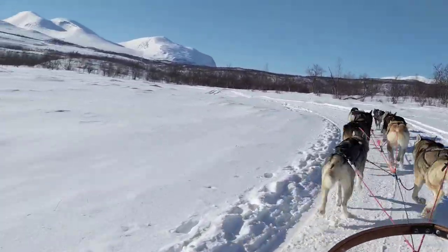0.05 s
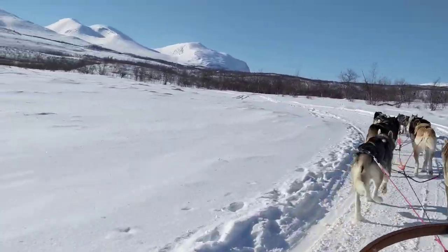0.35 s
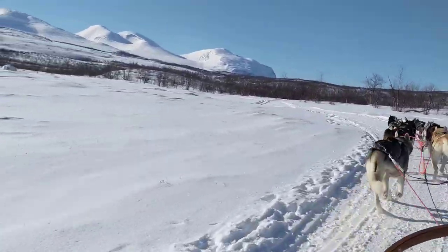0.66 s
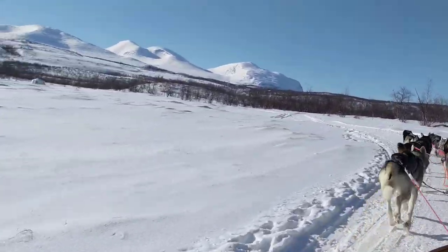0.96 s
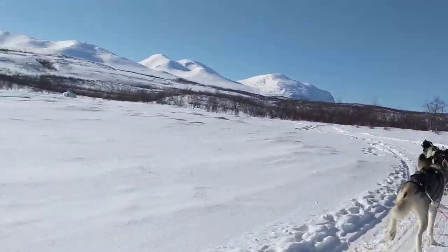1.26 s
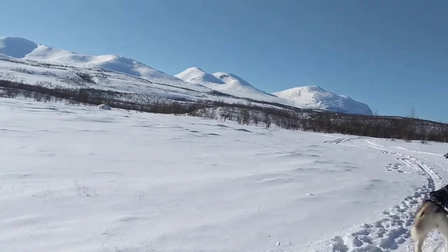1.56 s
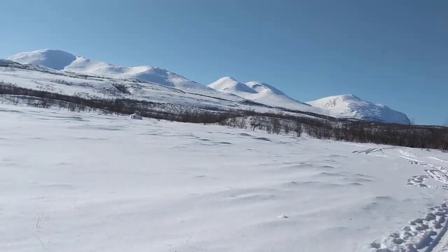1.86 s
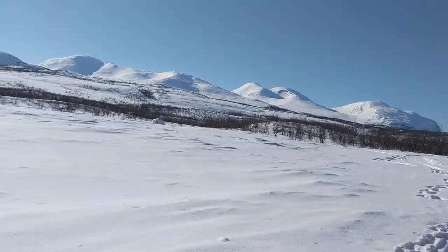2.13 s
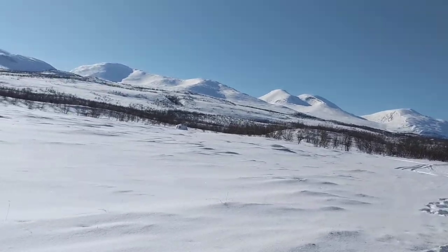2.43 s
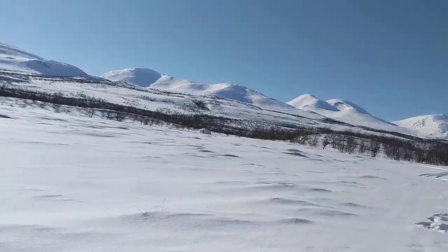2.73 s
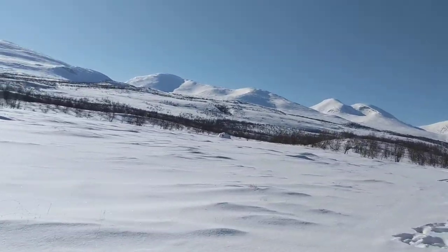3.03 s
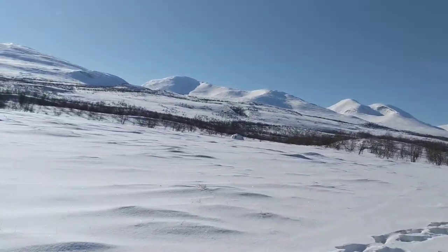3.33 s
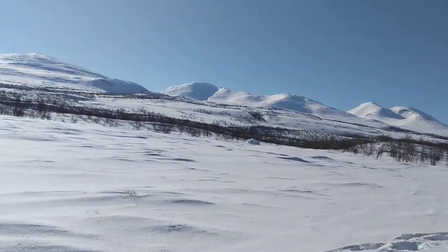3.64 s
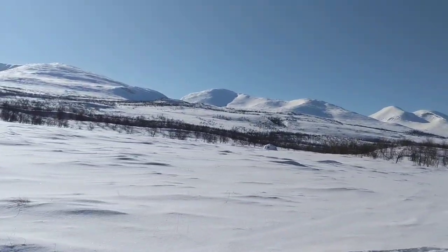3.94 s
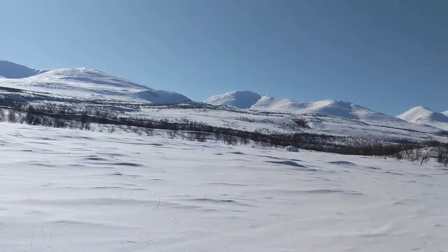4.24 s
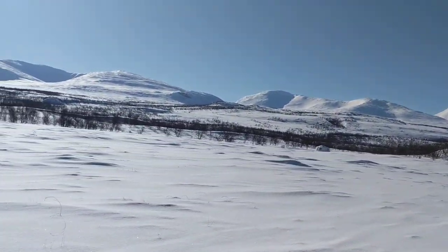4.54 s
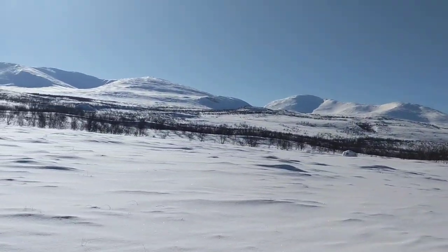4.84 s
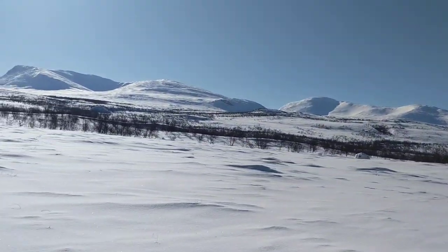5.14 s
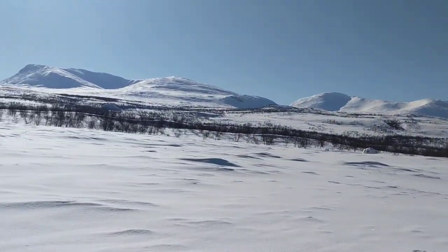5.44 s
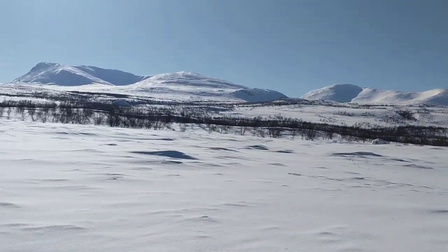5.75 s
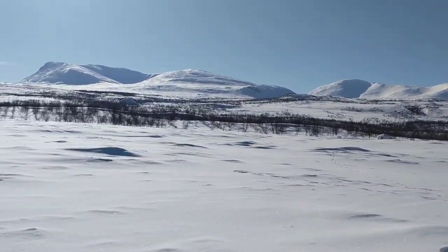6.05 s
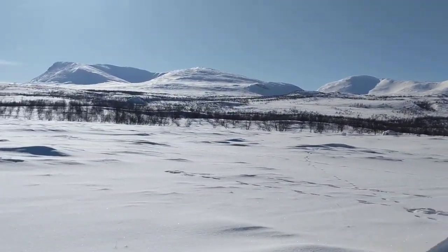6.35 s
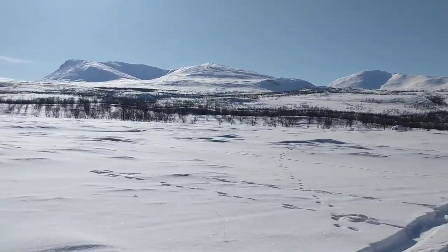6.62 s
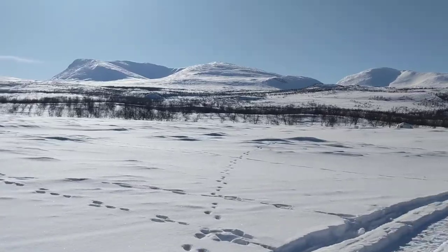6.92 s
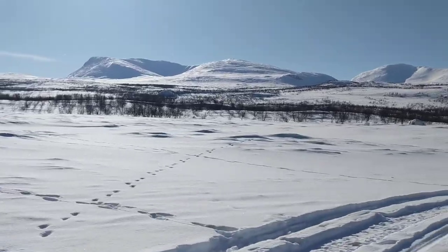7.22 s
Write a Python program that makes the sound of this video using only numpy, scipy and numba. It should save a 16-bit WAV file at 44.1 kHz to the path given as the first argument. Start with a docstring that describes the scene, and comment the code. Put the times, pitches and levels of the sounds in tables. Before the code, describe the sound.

A headwind buffets a microphone riding on a dog sled across open snow. The rough, fluttering rumble swells and dips unevenly, with dry pops and a few low thumps. Underneath, the runners hiss and scrape faintly, snow crust ticks, and metal harness snaps give tiny high clinks. One sharp click sounds close by early on. There is no echo.

```python
"""Headwind buffets a microphone riding on a dog sled over packed snow in open country.
Eddies (small whirls of air) at the microphone's opening make a rumble that gets brighter and louder
with the airspeed, with slow thumps, dry pops and overload on the hardest hits. Underneath, the runners
hiss and scrape, snow crust ticks, and metal snaps on the harness lines clink.
Faint, very high pings sparkle in the background, and one sharp click sounds close by."""
import sys
import numpy as np
from scipy import signal
from scipy.fft import rfft, irfft, next_fast_len
from scipy.io import wavfile
from scipy.ndimage import uniform_filter1d, minimum_filter1d
from numba import njit

SR = 44100
rng = np.random.default_rng(int(sys.argv[2]) if len(sys.argv) > 2 else 0)


def wav_record(signal):
    """Record a signal, one row per channel, as 16-bit PCM in the file named by sys.argv[1]."""
    frames = np.transpose(np.atleast_2d(signal))
    bounded = np.clip(frames, -1, 1)
    # unit amplitude maps onto the largest positive 16-bit level
    quanta = np.round(bounded * 32767).astype(np.int16)
    wavfile.write(sys.argv[1], SR, quanta)


N = 325458
TIME = np.arange(N) / SR

# The gusts, as how fast eddies pass the opening (faster air, more eddies): time_s, eddy_rate_hz
GUSTS = [(0.0, 810), (0.28, 660), (0.37, 754), (0.85, 960), (1.13, 627), (1.64, 610), (1.79, 817),
         (2.14, 622), (2.47, 308), (2.6, 840), (2.72, 700), (2.8, 407), (3.035, 583), (3.06, 895),
         (3.52, 750), (3.93, 654), (4.11, 833), (4.165, 367), (4.42, 257), (4.59, 343), (4.79, 498),
         (5.28, 458), (5.54, 797), (5.68, 533), (5.98, 675), (6.17, 963), (6.27, 560), (6.4, 388),
         (6.53, 685), (6.66, 370), (6.97, 696), (7.12, 430), (7.38, 416)]
# How the sound of the glide rises and falls, in relative levels: time_s, hiss_db, spray_db
GLIDE = [(0.0, -53.5, -63), (0.35, -51.5, -62), (0.55, -55.5, -66), (1.2, -57, -65), (1.58, -54, -62.5),
         (2.26, -60, -67.5), (2.46, -51.5, -59), (2.62, -61.5, -67.5), (2.86, -54, -59.5),
         (3.07, -56.5, -66), (3.19, -59.5, -65), (4.11, -58, -67.5), (4.5, -51, -59.5), (4.7, -55, -63.5),
         (5.3, -54.5, -64.5), (5.45, -57, -64.5), (5.9, -58.5, -67.5), (6.4, -58, -66), (7.38, -59, -67.5)]
# The tone of runners sliding on snow: pitch_hz, level_db
RUNNER_TONE = [(150, 24), (750, 8), (1200, 11), (2100, 9.5), (3200, 1), (5000, -0.5), (6500, 0),
               (7700, 4.5), (8400, -10), (10000, -39)]
# The tone of thrown powder snow: pitch_hz, level_db
POWDER_TONE = [(2000, 6), (6000, -3), (9000, 0), (11500, 0), (14000, -2.5), (16000, -7)]


def from_db(db):
    """Turn decibels into a number to multiply a sound by."""
    return 10 ** (np.asarray(db) / 20)


def rms_one(x):
    """Scale a signal so that its average size (rms) is 1."""
    return x / np.sqrt(np.mean(x ** 2) + 1e-20)


def in_time(rows):
    """Join the rows of a time table with straight lines, giving one curve per value column."""
    times_s, *columns = np.transpose(rows)
    return [np.interp(TIME, times_s, column) for column in columns]


def drift(rate_hz):
    """A smooth random wobble of size 1 that changes about rate_hz times a second."""
    r = np.exp(-2 * np.pi * rate_hz / SR)
    return rms_one(signal.lfilter([1], [1, -2 * r, r * r], rng.standard_normal(N + SR))[SR:])


def noise(tone):
    """Noise shaped by a table of pitch_hz, level_db."""
    hz, db = np.transpose(tone)
    size = next_fast_len(N)
    bins_hz = np.maximum(np.fft.rfftfreq(size, 1 / SR), 1)
    gain = from_db(np.interp(np.log(bins_hz), np.log(hz), db))
    return irfft(rfft(rng.standard_normal(size)) * gain, size)[:N]


def keep_side(x, hz, side, order):
    """Keep the "low" or "high" side of hz; a higher order cuts more steeply."""
    return signal.sosfilt(signal.butter(order, hz, side, fs=SR, output="sos"), x + 1e-18)


@njit
def moving_lowpass(x, corner_hz, damping):
    """Soften the treble above a corner pitch that moves from sample to sample."""
    out, band_state, low_state = np.empty(len(x)), 0., 0.
    for i in range(len(x)):
        g = np.tan(np.pi * corner_hz[i] / SR)
        band = (band_state + g * (x[i] - low_state)) / (1 + g * (g + damping))
        out[i] = low_state + g * band
        band_state, low_state = 2 * band - band_state, 2 * out[i] - low_state
    return out


def strikes(rows):
    """One click for each row of start_s, level_db."""
    start_s, level_db = np.transpose(rows)
    return np.bincount(np.clip(start_s * SR, 0, N - 1).astype(int), from_db(level_db), N)


def scatter(per_s):
    """Clicks at random times, with random heights up to 1."""
    return rng.random(N) * (rng.random(N) < per_s / SR)


def tails(clicks, decay_s):
    """Give each click a tail that dies away."""
    return signal.lfilter([1], [1, -np.exp(-1 / (decay_s * SR))], clicks + 1e-18)


def ring(clicks, hz, ring_s):
    """Each click starts a pure tone that fades by 60 dB in ring_s."""
    r, w = np.exp(-np.log(1000) / (ring_s * SR)), 2 * np.pi * hz / SR
    return signal.lfilter([0, np.sin(w)], [1, -2 * r * np.cos(w), r * r], clicks + 1e-18)


def swell(middle_s, half_length_s, edge=2):
    """A smooth rise to 1 and back; a larger edge gives a flatter top and steeper sides."""
    return np.exp(-.5 * np.minimum(np.abs(TIME - middle_s) / half_length_s, 10) ** edge)


def high_sparkle(count=16, pings_per_s=4.0, level_db=-60, pulse_hz=2.7, pulse_db=6.0):
    """Faint, very high pings at random times and pitches, pulsing and louder as the high hiss rises."""
    _, spray_db = in_time(GLIDE)
    pulse = np.sin(2 * np.pi * (pulse_hz * TIME + rng.random()))
    loudness = from_db(level_db + spray_db - spray_db.mean() + pulse_db * pulse)
    pitches_hz = rng.normal(12900, 650, count)
    return sum(ring(loudness * scatter(pings_per_s), hz, ring_s=.035) for hz in pitches_hz)


def harness_snaps(gain_db=-25.5, slide_s=.008):
    """Metal snaps slide briefly on their rings, and the rubbing makes them clink."""
    # When a snap touches, and how hard: start_s, level_db
    touches = [(0.0044, -42), (1.4067, -45), (2.8285, -44), (4.5341, -44), (4.5944, -49), (4.6359, -50),
               (4.6744, -52), (4.7421, -48), (4.9856, -55), (5.4784, -50), (7.0439, -44)]
    # The tones a snap rings with: pitch_hz, level_db, ring_s
    snap_tones = [(10900, -6, .015), (12100, -9.5, .02), (12650, 5, 0.03), (13150, -12, .04),
                  (13600, 3, .022), (14100, -6.5, .015)]
    slides = tails(strikes(touches), slide_s)
    contact = from_db(gain_db) * keep_side(slides, 120, "low", order=1)   # builds up over 1-2 ms
    return sum(ring(from_db(db) * contact * rng.standard_normal(N), hz, ring_s)
               for hz, db, ring_s in snap_tones)


def snow_crust(powder_db=-8.5, runner_db=-1.0, crumbs_per_s=7, crumb_db=-43):
    """Breaking crust ticks through the powder and through the runner; crumbs break in between."""
    # The crust snapping under the runners: start_s, level_db
    cracks = [(0.4115, -31), (0.6494, -40), (0.7327, -31), (0.8524, -45), (3.3553, -35), (4.4842, -32),
              (4.789, -38), (4.829, -32), (6.2437, -41), (6.336, -39), (6.7131, -38)]
    breaks = strikes(cracks) + from_db(crumb_db) * scatter(crumbs_per_s)
    crunch = from_db(powder_db) * noise(POWDER_TONE) + from_db(runner_db) * noise(RUNNER_TONE)
    return tails(breaks, decay_s=0.0025) * crunch


def runner_scrapes(runner_hz=4300):
    """Harder snow rubs a runner and makes it sound in a broad band around one pitch."""
    # Patches of harder snow: middle_s, half_length_s, level_db
    patches = [(0.39, .04, -54), (4.48, .02, -54), (6.39, 0.024, -52)]
    rubbing = rms_one(ring(rng.standard_normal(N), runner_hz, ring_s=0.0023))
    return rubbing * sum(from_db(db) * swell(middle_s, half_s) for middle_s, half_s, db in patches)


def runner_hiss(gain_db=6.5, hiss_grain_db=1.7, spray_grain_db=2.5, hiss_lump_db=0.9, spray_lump_db=1.0):
    """Countless crystals break under the runners; grains and lumps roughen the hiss and powder spray."""
    hiss_db, spray_db = in_time(GLIDE)
    grains, lumps = drift(130), drift(18)
    hiss = from_db(hiss_db + hiss_lump_db * lumps + hiss_grain_db * grains) * noise(RUNNER_TONE)
    spray = from_db(spray_db + spray_lump_db * lumps + spray_grain_db * grains) * noise(POWDER_TONE)
    return from_db(gain_db) * (hiss + spray)


def close_click(relax_hz=500):
    """A sudden step in pressure fades within a millisecond: one sharp click."""
    # The pressure step: start_s, level_db
    step = [(1.4465, -11)]
    return tails(strikes(step), decay_s=1 / (2 * np.pi * relax_hz))


def eddy_pops(dull_hz=4500, small_per_s=10, small_db=-30):
    """Eddies burst on the opening with a dry, dull crackle; small random ones grow with the gusts."""
    # The bigger bursts: start_s, level_db
    big_pops = [(0.0867, -11), (0.2045, -25), (0.7926, -15), (0.8485, -28), (3.0842, -21), (3.3545, -25),
                (3.9959, -19), (6.0114, -32), (6.551, -18.5), (6.9691, -12.5), (7.035, -17), (7.0863, -19)]
    # The tone of a burst: pitch_hz, level_db
    pop_tone = [(200, 1.5), (800, 14.5), (1500, 7.5), (2500, 4.5), (4000, -11.5), (6000, -15), (9000, -32)]
    eddy_hz, = in_time(GUSTS)
    small_pops = from_db(small_db) * (eddy_hz / eddy_hz.mean()) ** 2 * scatter(small_per_s)
    crackle = tails(strikes(big_pops) + small_pops, decay_s=0.0015) * noise(pop_tone)
    return keep_side(crackle, dull_hz, "low", order=4)


def eddy_thumps(half_length_s=0.015):
    """A big eddy rocks the microphone's thin membrane for two or three slow swings."""
    # The biggest, slowest eddies: middle_s, level_db, pitch_hz
    big_eddies = [(1.222, -18, 54.7), (3.224, -10.5, 53.3), (6.07, -23, 52)]
    thumps = np.zeros(N)
    for middle_s, level_db, pitch_hz in big_eddies:
        swing = np.sin(2 * np.pi * (pitch_hz * (TIME - middle_s) + rng.random()))
        thumps += from_db(level_db) * swell(middle_s, half_length_s) * swing
    return thumps


def airflow(top_db=-13.5, levels_off_hz=545, growth_power=2.6,
            swirl_share=0.076, swirl_db=1.21, flutter_share=0.22, flutter_db=3.5):
    """Airspeed sets the wind's eddy rate and level: gusts, lulls, buffets, slow swirl and fast flutter."""
    # The wind drops for an instant: middle_s, share_of_airspeed_left
    lulls = [(0.168, 0.74), (0.297, 0.71), (0.895, 0.65), (1.36, 0.55), (1.571, 0.64), (1.696, 0.62),
             (1.981, 0.61), (2.389, 0.57), (2.781, 0.59), (3.566, .72), (3.892, 0.39), (4.21, 0.89),
             (4.39, 0.75), (4.565, 0.99), (5.186, 0.65), (5.817, 0.84)]
    # Single large eddies hit the opening: middle_s, half_length_s, airspeed_factor, extra_db
    buffets = [(0.212, 0.013, 1.5, 4), (0.36, 0.014, 1.65, 1), (0.421, 0.02, 1.13, 1.5),
               (0.865, 0.0062, 1.16, 8), (0.901, 0.007, 1.47, 4), (1.063, 0.0068, 1.37, -0.5),
               (1.382, .011, 1.84, -3.5), (1.5, 0.016, 1.3, 2), (1.679, 0.008, 1.2, 7.5),
               (1.96, 0.0069, 1.32, 5), (2.026, 0.0075, 0.94, 11), (2.106, 0.012, 1.4, 3),
               (2.221, 0.012, 0.72, 8), (2.557, 0.016, 0.96, 1.5), (2.688, 0.0052, 1.2, 3),
               (2.888, 0.0081, 2, -1), (3.104, 0.015, 1.56, 1.5), (3.185, 0.01, 1.07, 13),
               (3.363, 0.0052, 0.98, 11), (3.806, 0.044, 1.24, 2.5), (3.999, 0.0092, 1.1, 5),
               (4.31, .028, 1.31, 5), (4.697, 0.011, 2, 0), (4.821, 0.004, 1.26, 6),
               (4.965, .011, 1.53, 2.5), (5.102, .012, 1.06, 8), (5.425, 0.0081, 0.96, 6),
               (5.772, .01, 1.65, 1.5), (6.01, 0.0051, 1.15, 6), (6.07, 0.0074, 1.21, 3.5),
               (6.503, 0.0091, 1.37, 5), (6.754, .018, 1.4, 1), (6.86, 0.0086, 1.35, 0),
               (6.966, 0.0086, 1.16, 9), (7.075, 0.018, 0.85, 8.5), (7.264, 0.011, 2.04, 1.5)]
    eddy_hz, = in_time(GUSTS)
    push_db = 0
    for middle_s, share_left in lulls:
        eddy_hz *= share_left ** swell(middle_s, half_length_s=0.025, edge=2.44)
    for middle_s, half_length_s, airspeed_factor, extra_db in buffets:
        bump = swell(middle_s, half_length_s)
        eddy_hz *= airspeed_factor ** bump
        push_db += extra_db * bump
    # the rumble grows with the eddy rate, then levels off
    level_db = top_db - 10 * np.log10(1 + (levels_off_hz / eddy_hz) ** growth_power)
    # the flow flips between clinging to the surface and tearing away
    swirl, flutter = np.tanh(2 * drift(14)), np.tanh(drift(100))
    eddy_hz *= np.exp(swirl_share * swirl + flutter_share * flutter)
    level_db += push_db + swirl_db * swirl + flutter_db * flutter
    return eddy_hz, level_db


def bass_heave(pressure, below_hz=190, rate_hz=12, depth_db=3.0):
    """The largest eddies come and go by themselves, so the bass rises and falls on its own."""
    bass = keep_side(pressure, below_hz, "low", order=2)
    bass = keep_side(bass[::-1], below_hz, "low", order=2)[::-1]   # a backward pass undoes the delay
    heave = from_db(depth_db * np.tanh(drift(rate_hz)))
    return pressure + bass * (heave - 1)


def wind_rumble(lowest_hz=38):
    """Churning air rumbles up to about the eddy rate; above it, friction in the air kills small eddies."""
    # How the microphone's opening lets wind pressure through: pitch_hz, level_db
    opening_tone = [(20, -30), (36, -23), (50, -4.5), (80, -3), (150, 0), (280, -1.5), (520, -1),
                    (1000, -1.5), (2000, -3), (5000, -1)]
    eddy_hz, level_db = airflow()
    eddy_hz = np.clip(eddy_hz, 50, 5000)
    pressure = moving_lowpass(noise(opening_tone), 0.8 * eddy_hz, damping=1.58)
    pressure = moving_lowpass(pressure, 1.79 * eddy_hz, damping=2.22)
    # brighter noise holds more power: even that out before setting the level
    pressure = from_db(level_db) * rms_one(pressure / np.sqrt(eddy_hz))
    return keep_side(bass_heave(pressure), lowest_hz, "high", order=3)


def scene():
    """Wind and sled add up in one channel; open snow gives no echo."""
    air = wind_rumble() + eddy_thumps() + eddy_pops()
    sled = runner_hiss() + runner_scrapes() + snow_crust() + harness_snaps()
    return (air + sled + high_sparkle() + close_click())[None]


def record(dry, ceiling=.71, hold_s=0.004, cutoff_hz=15900):
    """A fast limiter turns down peaks that pass the ceiling; then the highest treble is cut."""
    span = 2 * int(hold_s * SR / 2) + 1
    needed_gain = ceiling / np.maximum(np.abs(dry), ceiling)
    held_gain = minimum_filter1d(needed_gain, 2 * span)
    smooth_gain = uniform_filter1d(uniform_filter1d(held_gain, span), span)
    treble_cut = signal.ellip(12, .1, 80, cutoff_hz, fs=SR, output="sos")
    return signal.sosfilt(treble_cut, dry * smooth_gain)


dry = scene()
out = record(dry)
wav_record(out)
```